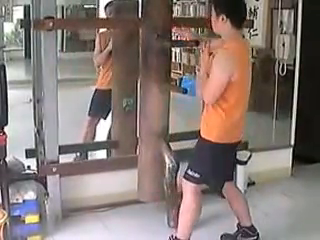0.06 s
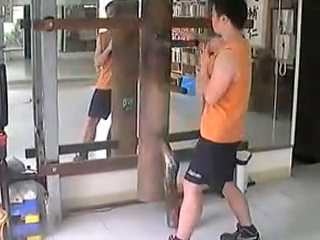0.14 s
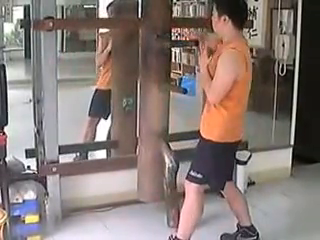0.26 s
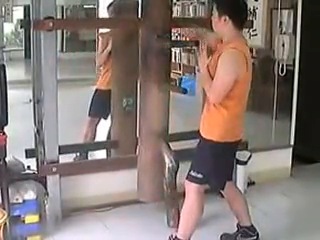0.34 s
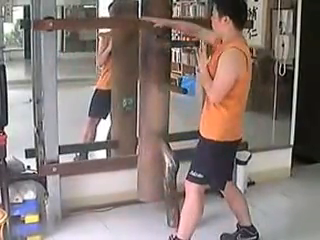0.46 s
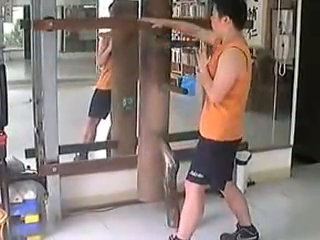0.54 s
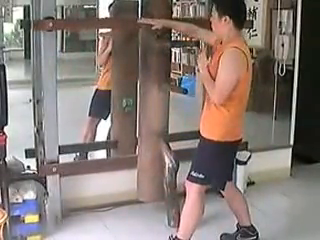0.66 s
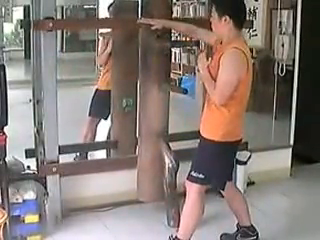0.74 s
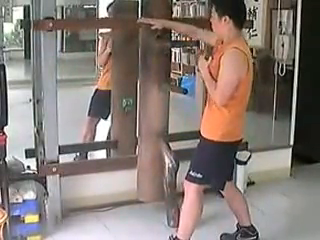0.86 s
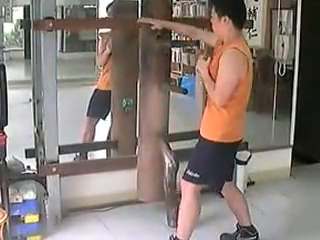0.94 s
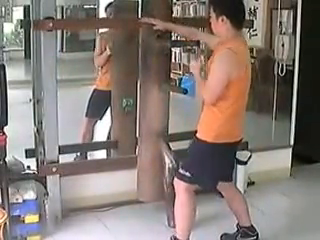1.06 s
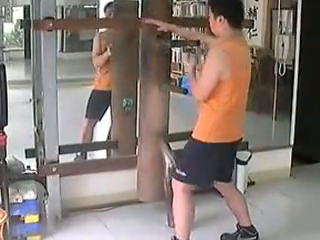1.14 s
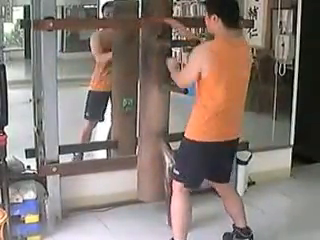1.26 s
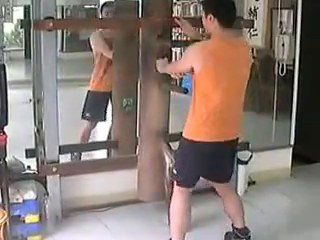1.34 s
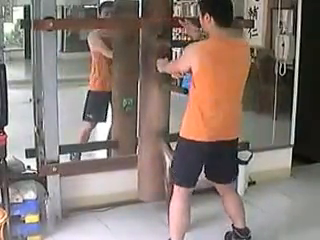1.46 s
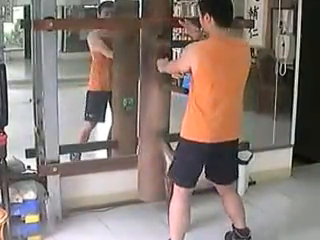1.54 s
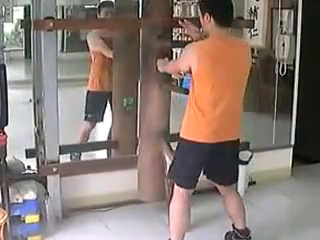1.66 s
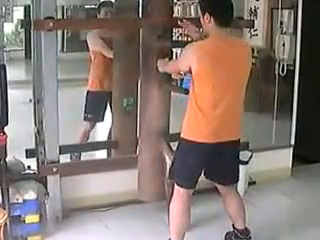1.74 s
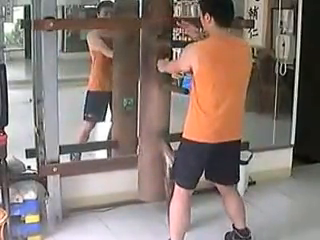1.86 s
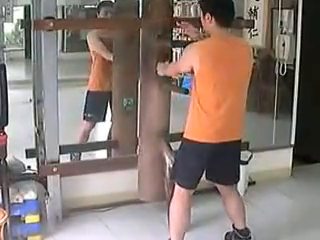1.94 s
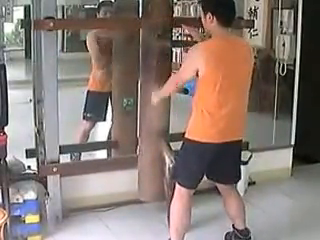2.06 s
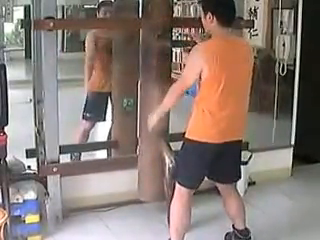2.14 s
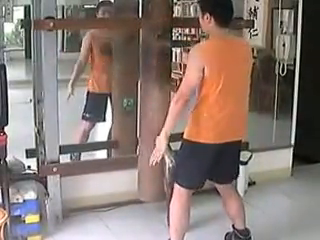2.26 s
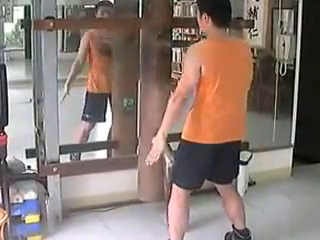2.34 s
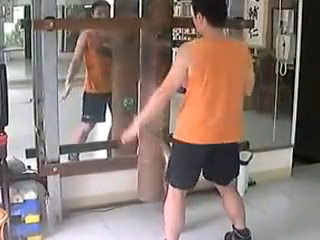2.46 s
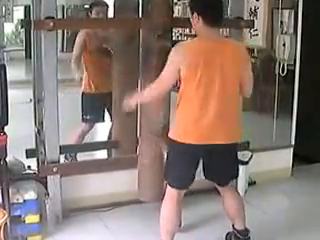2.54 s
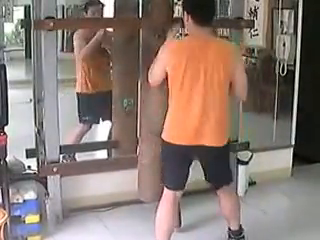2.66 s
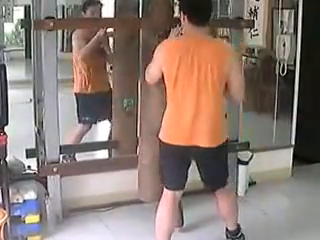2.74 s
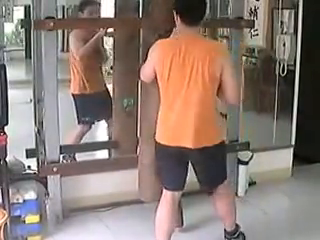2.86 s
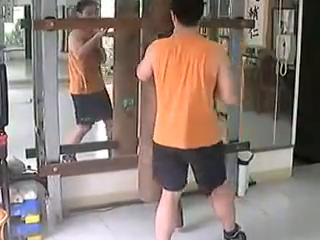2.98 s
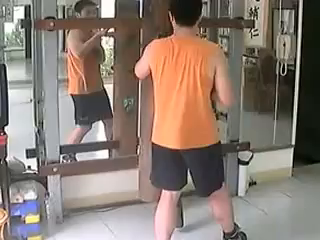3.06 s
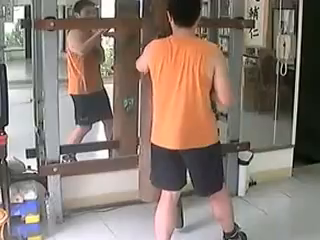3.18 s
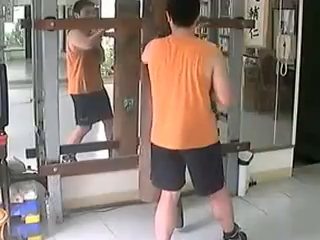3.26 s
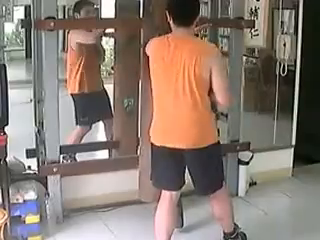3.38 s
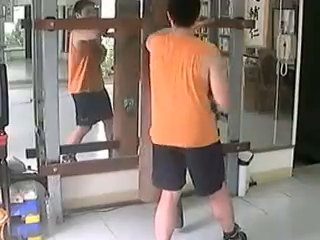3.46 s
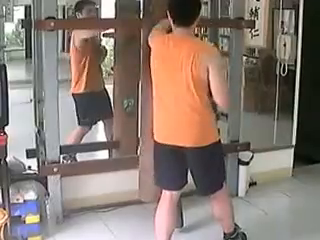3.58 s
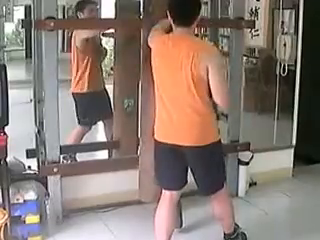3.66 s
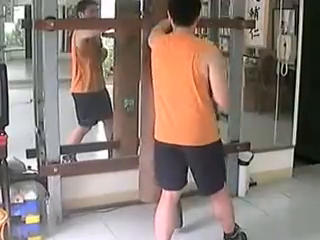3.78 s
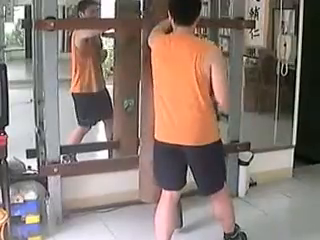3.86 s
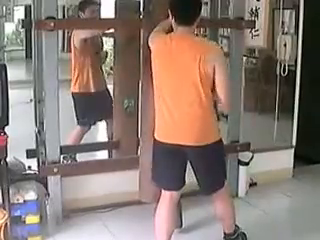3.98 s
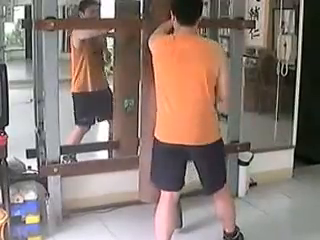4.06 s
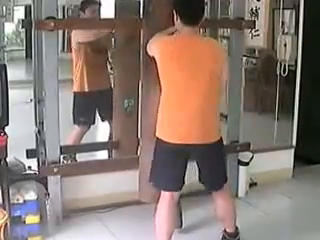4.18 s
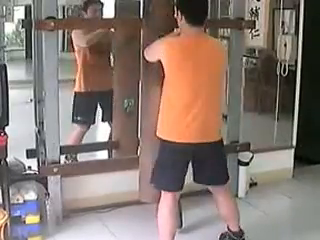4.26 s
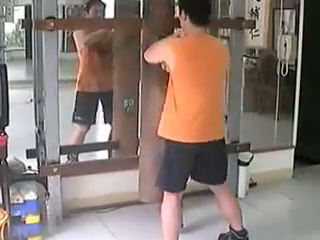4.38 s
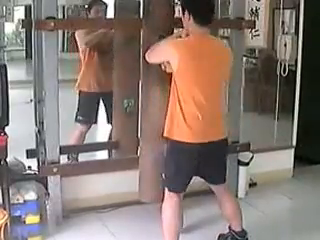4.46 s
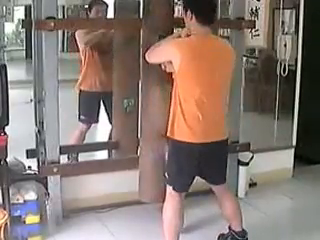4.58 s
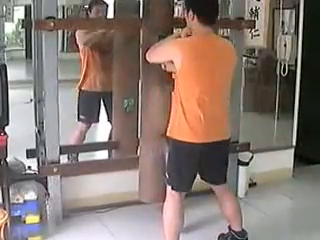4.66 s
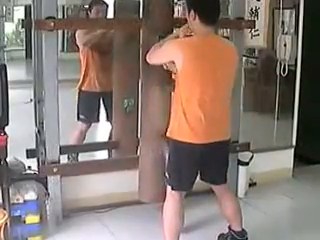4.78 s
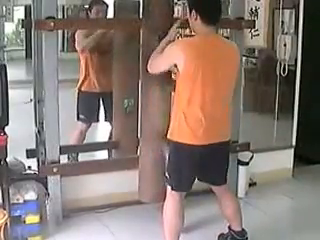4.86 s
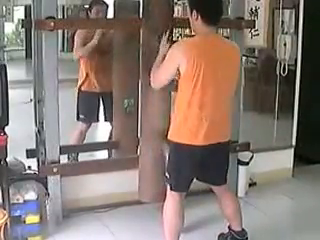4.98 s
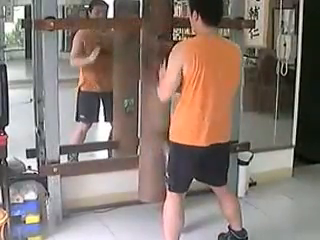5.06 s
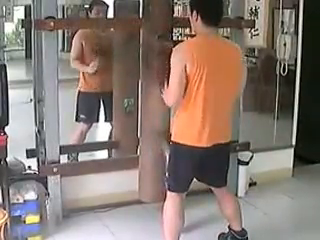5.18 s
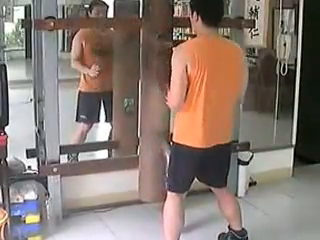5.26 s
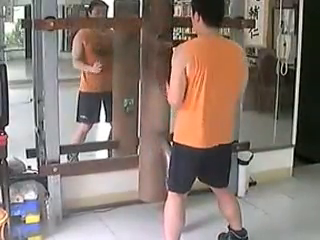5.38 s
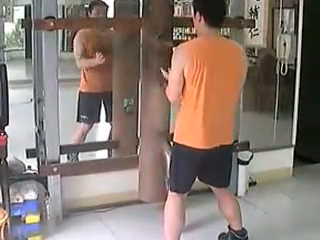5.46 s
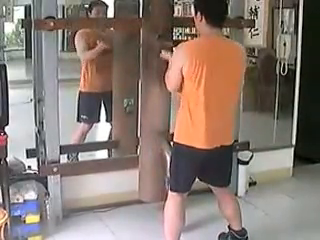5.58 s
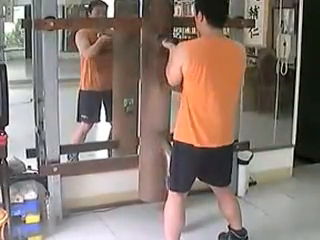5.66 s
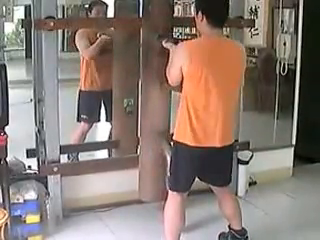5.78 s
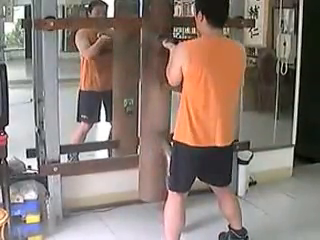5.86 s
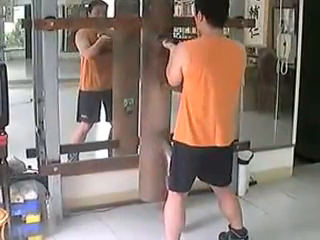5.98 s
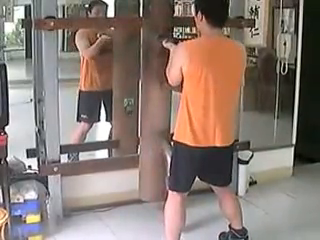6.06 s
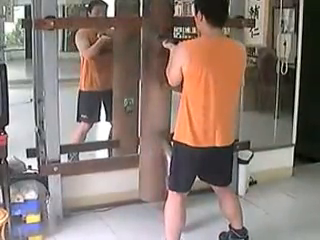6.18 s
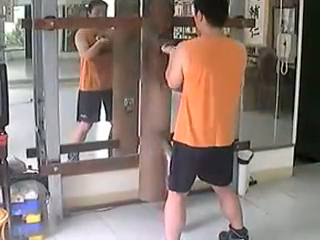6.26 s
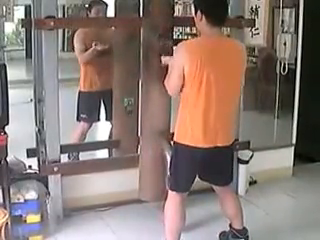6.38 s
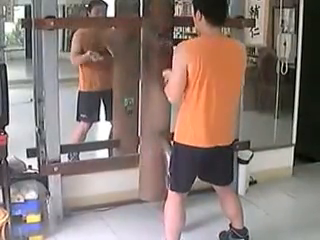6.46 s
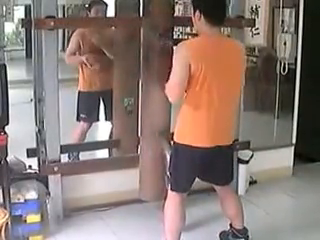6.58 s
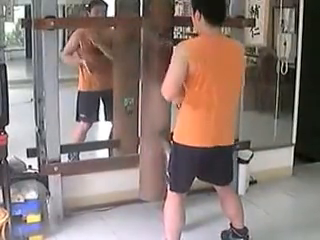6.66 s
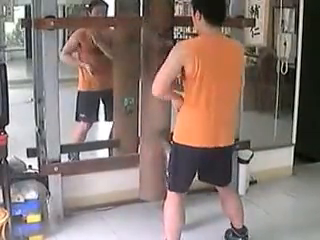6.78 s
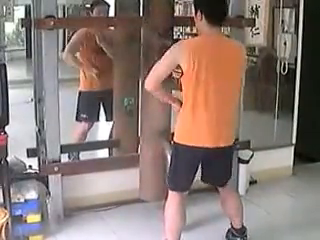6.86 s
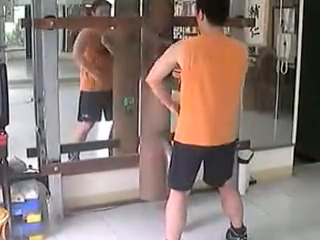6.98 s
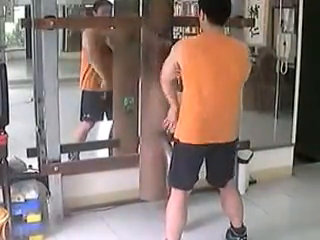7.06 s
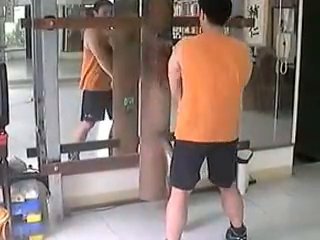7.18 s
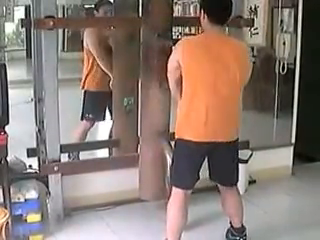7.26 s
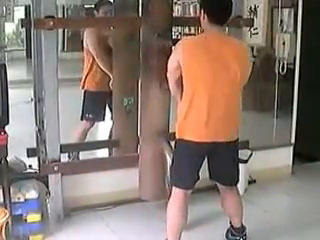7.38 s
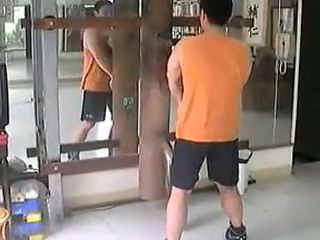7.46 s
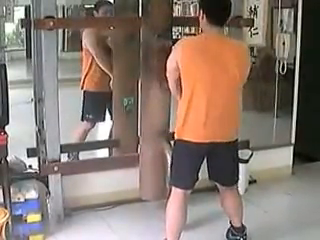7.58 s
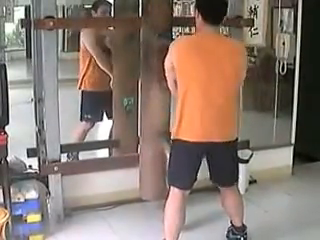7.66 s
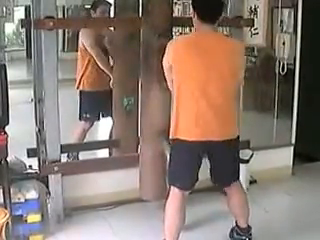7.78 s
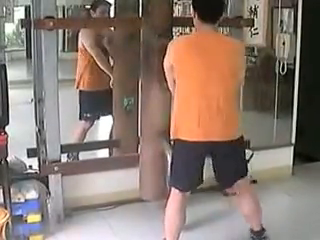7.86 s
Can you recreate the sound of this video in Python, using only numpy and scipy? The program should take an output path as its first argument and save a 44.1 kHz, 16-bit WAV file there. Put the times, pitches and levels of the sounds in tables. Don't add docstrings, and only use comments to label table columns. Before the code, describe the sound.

A steady low hum of air with faint hiss fills a tiled room for about eight seconds. At 0.4 s a hard slap of forearm on wood lands with a knock and a loud, hollow low boom. Softer knocks with a small boom follow at 1.3 s, a faint pat at 1.7 and a light, duller blow at 2.6, with cloth and shoe swishes between. At 3.5 s comes another sharp slap and the strongest boom. A faint pat at 4.15 leads into a sliding, clacking flurry at 4.3 to 4.45. From 5.6 to 5.7 a dense cluster of bright slaps, skin slides, rattling arms and overlapping booms bursts out, then one lone slap at 5.9. A last quick group hits at 7.1 to 7.2, then only rustle and hum remain. Reverberation is short and bright; the small stereo microphone leans right in the lows.

```python
import sys
import numpy as np
from scipy import signal
from scipy.fft import rfft, irfft, next_fast_len
from scipy.io import wavfile
from scipy.ndimage import uniform_filter1d

SR = 44100
rng = np.random.default_rng(int(sys.argv[2]) if len(sys.argv) > 2 else 0)


def transcribe(signal):
    frames = np.atleast_2d(signal).T
    limited = np.clip(frames, -1, 1)
    pcm = np.round(limited * 32767).astype(np.int16)
    wavfile.write(sys.argv[1], SR, pcm)


def amplitude_ratio(level_db):
    exponent = np.asarray(level_db, float) / 20
    return 10 ** exponent


N = 349271


def evened(x):
    return x / np.sqrt(np.mean(x ** 2) + 1e-20)


def peaked(x, db):
    power = uniform_filter1d(x ** 2, size=200)
    return amplitude_ratio(db) * x / np.sqrt(power.max())


def read(points, hz):
    f, value = np.transpose(points)
    return np.interp(np.log(hz + 1), np.log(f + 1), value)


def add(mix, s, sound):
    part = mix[round(s * SR):][:len(sound)]
    part += sound[:len(part)]


def colour(x, points):
    size = next_fast_len(x.shape[-1])
    gain = amplitude_ratio(read(points, np.fft.rfftfreq(size, 1 / SR)))
    return irfft(rfft(x, size) * gain, size)[..., :x.shape[-1]]


def ring(modes, tuning=1):
    t = np.arange(SR // 3) / SR
    return sum(amplitude_ratio(db - 60 * t / t60) * np.sin(2 * np.pi * hz * tuning * t) for hz, db, t60 in modes)


def contact(length, rise):
    t = np.arange(SR // 10) / SR
    return (1 - np.exp(-t / max(rise, 2e-4))) * np.exp(-t / max(length, 1e-3))


def half_sine(seconds, hz):
    t = np.arange(int(seconds * SR)) / SR
    return np.sin(np.pi * t / t[-1]) * np.sin(2 * np.pi * hz * t)


def drifting(patch_db, swell_db):
    frames = N // 256 + 5
    a, b, patches = rng.standard_normal((3, 2, 513, frames))
    patches = uniform_filter1d(patches[0], size=10, axis=0)
    patches = evened(uniform_filter1d(patches, size=10, axis=1))
    swell = evened(uniform_filter1d(rng.standard_normal(frames), size=8))
    z = (a + 1j * b) * amplitude_ratio(patch_db * patches + swell_db * swell)
    return signal.istft(z, nperseg=1024, noverlap=768)[1][:, :N]


# frequency in Hz, density in dB per Hz.
AIR = [(25, -24.5), (55, -12), (130, -7.5), (230, 2), (300, -2.5), (340, -17), (500, -16), (1000, -14),
       (1500, -18), (2200, -20.5), (4000, -30.5), (6000, -39), (10000, -64)]


def air():
    return amplitude_ratio(-23.5) * evened(colour(drifting(1.34, 0.28), AIR))


# frequency in Hz, density in dB per Hz.
CLOTH = [(500, -28), (1500, 5.5), (3000, 13), (6000, 13), (10000, -11.5)]
# fastest motion in seconds, rustle in dB, build-up in seconds.
MOVES = [(0.501, -36.5, 0.1), (1.218, -30, 0.19), (1.749, -55, 0.034), (2.15, -43.5, 0.074),
         (2.551, -36, .15), (3.2, -36, 0.055), (3.7, -45, .08), (4.28, -34, 0.23), (5.0, -49.5, 0.39),
         (5.82, -36.5, 0.31), (6.2, -44, 0.29), (6.682, -40.5, 0.19), (7.5, -48, 0.28)]


def swish():
    settle, still_db = .9, -45.5
    t = np.arange(N) / SR
    power = amplitude_ratio(still_db) ** 2
    for s, db, build in MOVES:
        pace = np.where(t < s, build, settle * build)
        power = power + amplitude_ratio(db) ** 2 * np.exp(-2 * abs(t - s) / pace)
    return np.sqrt(power) * evened(colour(drifting(1.5, 1.5), CLOTH))


# frequency in Hz, t60 in seconds.
ROOM = [(250, 0.44), (1000, 0.54), (4000, 0.64), (10000, 0.39)]


def room(x):
    taps = np.zeros((2, SR))
    at = np.arange(300, SR - 20, 20) + rng.integers(0, 20, (2, (SR - 301) // 20))
    np.put_along_axis(taps, at, rng.choice([-1., 1.], at.shape), 1)
    hz, t, z = signal.stft(taps, SR, nperseg=256)
    decay = amplitude_ratio(-60 * t / read(ROOM, hz)[:, None])
    tail = signal.istft(z * decay, SR, nperseg=256)[1]
    return signal.fftconvolve(x[None], tail / np.linalg.norm(tail[0]), axes=1)[:, :N]


# start in seconds, peak in dB, tuning as a factor, push in seconds.
SHOVES = [(0.427, 0.5, 0.99, 0.015), (1.291, -10, 0.97, 0.016), (1.384, -25, 1.07, 0.029),
          (2.643, -14, 0.75, 0.021), (3.543, 0.9, 1.002, 0.014), (4.276, -8, 0.97, 0.021),
          (4.298, -40, 0.53, 0.01), (5.591, -14.5, 0.82, 0.078), (5.632, -11.5, .78, 0.028),
          (5.663, -6, 1.001, 0.014), (5.701, -9.5, 0.82, 0.022), (7.098, -3.5, 1.001, 0.014),
          (7.11, -7.5, .7, 0.021), (7.204, -16, 0.75, 0.032)]
# frequency in Hz, level in dB, t60 in seconds.
TRUNK = [(236, -3, 0.54), (272.6, 2.5, 0.42), (295.5, 2.5, 0.23), (305.7, 4, 0.14), (347, -22, 0.2)]
# start in seconds, peak in dB.
THUMPS = [
    (0.426, -18),
    (3.543, -14),
    (4.298, -14),
    (5.639, -30),
    (5.671, -20),
    (7.103, -25),
    (7.116, -17),
    (7.139, -14.5),
]
# frequency in Hz, level in dB, t60 in seconds.
FRAME = [(120, -2, .12), (155, 0, .12), (195, -5, .09)]


def shoves():
    out = np.zeros(N)
    for s, db, tuning, length in SHOVES:
        push = half_sine(max(length, .002), 285 * tuning)
        add(out, s + 0.00414, peaked(signal.fftconvolve(push, ring(TRUNK, tuning)), db))
    heave = half_sine(.013, 160)
    for s, db in THUMPS:
        add(out, s, peaked(signal.fftconvolve(heave, ring(FRAME)), db))
    return out


# start in seconds, peak in dB, strongest mode in Hz,
# rattle in seconds.
KNOCKS = [(0.428, -19, 1900, 0.0044), (0.432, -18, 643, 0.014), (1.285, -16, 660, 0.0095),
          (1.291, -20, 1330, 0.032), (1.384, -21.5, 690, 0.0077), (2.644, -19.5, 438, 0.011),
          (2.661, -16, 445, 0.0077), (2.676, -21.5, 1026, 0.026), (3.548, -25.5, 790, 0.062),
          (4.276, -8, 677, 0.0033), (4.299, -15.5, 694, 0.0026), (4.314, -22, 644, 0.025),
          (5.59, -12, 725, 0.013), (5.634, -11, 950, 0.017), (5.647, -20, 603, 0.011),
          (5.656, -11, 706, 0.036), (5.675, -17, 1010, 0.0067), (5.704, -15.5, 966, 0.018),
          (7.1, -15.5, 499, 0.0072), (7.112, -17, 727, 0.046), (7.137, -11.5, 1174, 0.02),
          (7.149, -17, 730, 0.0042), (7.203, -19, 566, 0.0042)]
# frequency in Hz, level in dB, t60 in seconds.
ARMS = [(481, -35.5, 0.0033), (690, -13.5, 0.05), (815, 2.5, 0.019), (1010, -5.5, 0.035),
        (1300, -11, 0.099), (1860, -6, 0.022),
        (1211, -4, 0.03), (1330, -27.5, 0.12), (1870, -10, 0.035)]


def knocks():
    out, taps = np.zeros(N), np.zeros(N)
    grit = rng.standard_normal((len(KNOCKS), SR // 10))
    for (s, db, hz, length), clatter in zip(KNOCKS, grit):
        arm = ring(ARMS + [(hz, 4, .055)])
        knock = peaked(signal.fftconvolve(clatter * contact(length, 0.0009), arm), db)
        add(out, s - .001, knock)
        add(taps, s, arm * np.linalg.norm(knock) / np.linalg.norm(arm))
    return out, taps


# start in seconds, peak in dB, brightest spot in Hz, contact in seconds,
# top-end sizzle in dB.
SLAPS = [(0.4279, -14, 3500, 0.014, -12), (1.2829, -15.5, 3960, 0.0053, -20.5),
         (1.3667, -17, 2630, 0.0066, -18.5), (1.6886, -32.5, 2180, 0.0032, -13.5),
         (2.6105, -20.5, 2550, 0.0067, -20), (3.5435, -12, 3830, 0.0098, -21.5),
         (4.1583, -26, 3710, 0.0072, -37), (4.2762, -18, 4900, 0.0096, -7),
         (4.3082, -19, 4900, 0.0075, -15), (4.383, -22, 4740, 0.011, -48),
         (4.4255, -21, 4670, 0.0052, -37.5), (5.5971, -24.5, 2900, 0.0033, -3.5),
         (5.6201, -10.5, 3120, 0.0069, -14.5), (5.6386, -11, 4570, 0.013, -14),
         (5.6529, -16, 5680, 0.017, -20), (5.9381, -21, 2770, 0.0083, -17),
         (7.1, -15.5, 4710, 0.023, -15.5), (7.1133, -22.5, 3930, 0.037, -21),
         (7.1378, -22, 2510, 0.02, -36)]
# start in seconds, peak in dB, contact in seconds.
SLIDES = [
    (2.5979, -23.5, 0.029),
    (4.252, -21.5, 0.037),
    (5.5715, -15.5, 0.042),
    (5.5816, -17.5, 0.037),
    (5.6039, -20, 0.033),
    (7.0897, -25, 0.012),
]
# frequency in Hz, density in dB per Hz.
SKIN = [(300, 8.5), (1000, 2), (2000, 8), (4000, 10), (6000, 7), (7500, 1)]


def slaps():
    rows = [(s, db, hz, length, 0.0012, top_db) for s, db, hz, length, top_db in SLAPS]
    rows += [(s, db, 4450, length, 0.91 * length, -19.5) for s, db, length in SLIDES]
    out, clicks = np.zeros(N), np.zeros(N)
    grit = rng.standard_normal((len(rows), 2, SR // 10))
    for (s, db, hz, length, rise, top_db), (hiss, grain) in zip(rows, grit):
        skin = SKIN + [(8500, top_db)]
        burst = evened(colour(hiss * amplitude_ratio(3.6 * grain), skin)) * contact(length, rise)
        spot = signal.fftconvolve(burst, ring([(hz, 0, .014)])[:2000])[:len(burst)]
        slap = peaked(peaked(burst, 0) + peaked(spot, -6), db)
        click = colour(signal.unit_impulse(512, 256), skin)
        add(out, s - .001, slap)
        add(clicks, s, click * np.linalg.norm(slap) / np.linalg.norm(click))
    return out, clicks


# frequency in Hz, gain in dB.
LOW_CUT = [(35, -45), (100, 3.5), (200, 1.5)]


def scene():
    skin, clicks = slaps()
    arms, taps = knocks()
    trunk = shoves()
    wet = room(amplitude_ratio(-3.5) * clicks + amplitude_ratio(-4.0) * taps + amplitude_ratio(-7.5) * trunk)
    direct = [[1], [.4]] * (skin + amplitude_ratio(-1.5) * arms + amplitude_ratio(-3.0) * trunk)
    return colour(direct + wet, LOW_CUT) + air() + swish()


def low_pass(x):
    return signal.sosfilt(signal.butter(12, 11910, fs=SR, output="sos"), x)


# frequency in Hz, likeness from 0 to 1.
SAME = [(60, .45), (270, .5), (1200, .4), (3000, .5), (6000, .55), (11000, .6)]
# frequency in Hz, left minus right in dB.
LEAN = [(60, -9.5), (140, -8), (340, -10.5), (820, -7), (1970, -4.5), (4720, -0.5), (11300, 1.5)]
# frequency in Hz, lead of the left in radians.
TURN = [(300, .05), (1200, 1.58), (3270, 2.55), (7240, 1.58), (9000, 1.4), (11000, 1.5)]
# frequency in Hz, gain in dB.
MIC = [(5500, -1.5), (6800, -2.5), (7600, -19.5), (8000, -25), (8350, -3.5), (9000, 8.5), (10000, 18.5),
       (11000, 16), (11600, -100), (12200, -88)]


def record(dry):
    size = next_fast_len(N)
    hz = np.fft.rfftfreq(size, 1 / SR)
    front, side = rfft(dry, size)
    same = np.clip(read(SAME, hz), 0, 1)
    left = same * np.exp(1j * read(TURN, hz)) * front + np.sqrt(1 - same ** 2) * side
    spectra = np.array([amplitude_ratio(read(LEAN, hz)) * left, front]) * amplitude_ratio(read(MIC, hz))
    ports = irfft(spectra, size)[:, :N]
    return low_pass(np.clip(ports, -1, 1))


dry = scene()
out = record(dry)
transcribe(out)
```